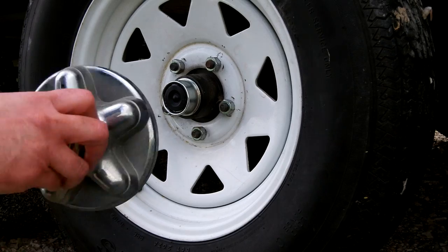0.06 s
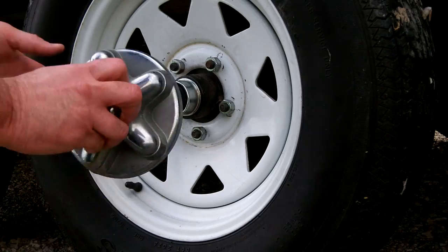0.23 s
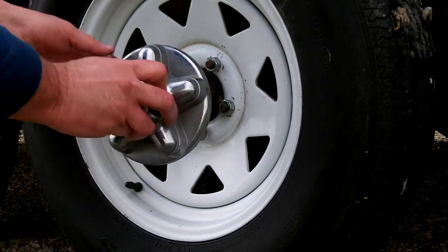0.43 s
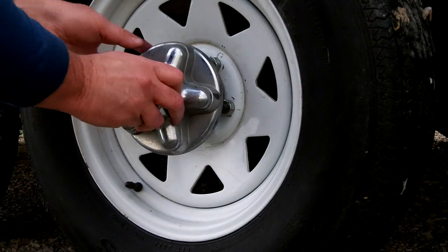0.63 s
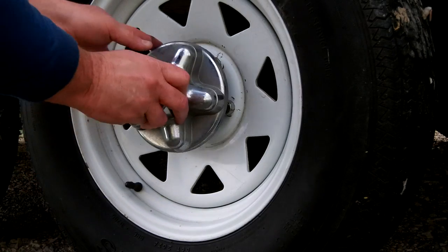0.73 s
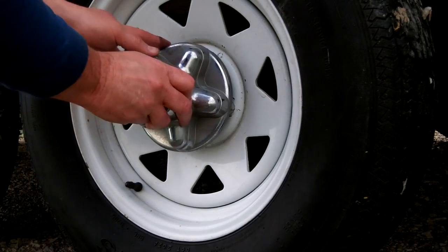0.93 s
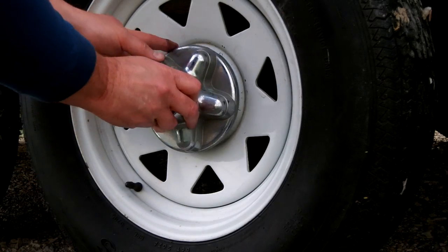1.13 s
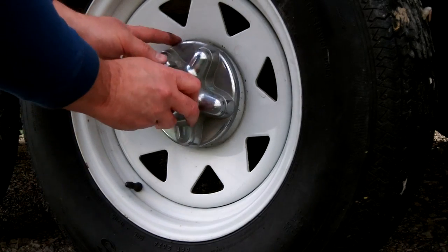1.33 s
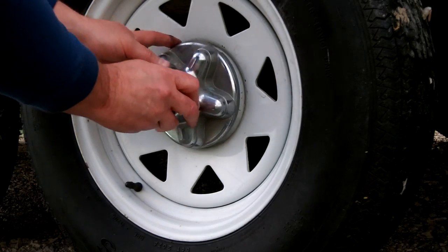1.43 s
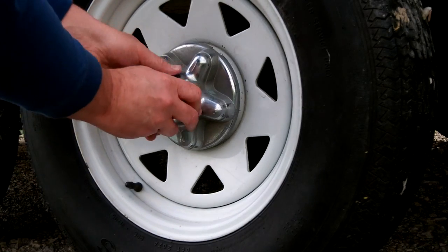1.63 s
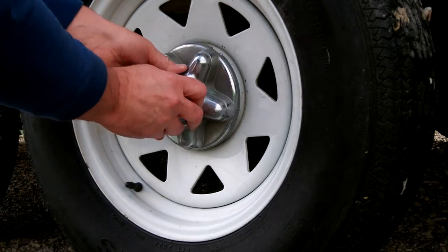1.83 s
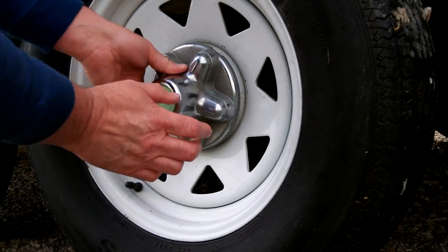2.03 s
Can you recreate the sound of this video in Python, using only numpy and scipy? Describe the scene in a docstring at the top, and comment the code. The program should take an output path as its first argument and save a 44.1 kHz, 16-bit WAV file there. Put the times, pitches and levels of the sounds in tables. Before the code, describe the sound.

A metal hubcap scrapes and taps against a wheel hub, then snaps into place.

```python
"""Low handling rumble, rustling sleeves and a faint hiss of open air, on one microphone close to a trailer
wheel outdoors. A steel hubcap is pushed on: its rim scrapes and taps the hub, then snaps home at 1.7 s,
and a faint bright hiss follows. Each strike, and each stick-slip click of a scrape, rings the cap's modes
and a brief clatter of cap and wheel. The hands damp the ring."""
import sys
import numpy as np
from scipy import signal
from scipy.fft import rfft, irfft, next_fast_len
from scipy.io import wavfile
from scipy.ndimage import uniform_filter1d

SR = 44100
rng = np.random.default_rng(int(sys.argv[2]) if len(sys.argv) > 2 else 0)


def master_out(mix):
    """Clip the mix to full scale and print it as 16-bit PCM to the path in sys.argv[1]."""
    frames = np.transpose(np.atleast_2d(mix))
    ceiling = np.clip(frames, -1, 1)
    pcm = np.round(ceiling * 32767).astype(np.int16)
    wavfile.write(sys.argv[1], SR, pcm)


N = 91728


def undb(db):
    """Decibels to gain."""
    return 10 ** (np.asarray(db) / 20)


def unit(x):
    """Scale to rms 1."""
    return x / np.sqrt(np.mean(x ** 2) + 1e-20)


def add(out, start_s, x):
    """Mix a sound in at a time."""
    i = int(start_s * SR)
    out[i:i + len(x)] += x[:len(out) - i]


def curve(rows):
    """Gain over time from (t/s, level/dB) points."""
    return undb(np.interp(np.arange(N) / SR, *np.array(rows).T))


def flutter(rate_hz, spread_db):
    """Gain that wanders smoothly at random around 0 dB."""
    hold = int(SR / rate_hz)
    steps = np.repeat(rng.standard_normal(N // hold + 1), hold)
    return undb(spread_db * unit(uniform_filter1d(steps, hold)[:N]))


def fade(t, t60):
    """Exponential decay, 60 dB down after t60 seconds."""
    return np.exp(-np.log(1000) * t / t60)


def colour(x, points, hump=None):
    """Causal filter through (f/Hz, level/dB) points, with an optional narrow (f/Hz, boost/dB) hump."""
    n = 2 * next_fast_len(len(x))
    octave = np.log2(np.maximum(np.arange(n // 2 + 1) * SR / n, 1))
    hz, db = np.array(points, float).T
    shape_db = np.interp(octave, np.log2(hz), db)
    if hump:
        hump_hz, boost_db = hump
        width_octaves = 0.13
        shape_db += boost_db * np.exp(-.5 * ((octave - np.log2(hump_hz)) / width_octaves) ** 2)
    # minimum phase: nothing sounds ahead of a strike
    cepstrum = irfft(np.log(undb(shape_db)))
    cepstrum[1:n // 2] *= 2
    cepstrum[n // 2 + 1:] = 0
    return irfft(rfft(x, n) * np.exp(rfft(cepstrum)))[:len(x)]


def noise(spectrum):
    """Scene-long noise of rms 1, shaped by (f/Hz, level/dB) points."""
    return unit(colour(rng.standard_normal(N), spectrum))


def outdoor_air():
    """The open air around the trailer: a faint, dull hiss."""
    # spectrum of the hiss: f/Hz, relative level/dB
    spectrum = [(150, -16), (250, -3.5), (450, -4.5), (1100, -12.5), (1650, -15.5), (2500, -21),
                (3150, -19.5), (4400, -28.5), (5600, -43), (6900, -58), (7400, -65), (11000, -58.5),
                (15000, -74.5)]
    # its course: t/s, level/dB
    levels = [(0, -64), (.55, -64.5), (.85, -64), (1.15, -64), (1.8, -61.5), (1.95, -66.5), (2.08, -62.5)]
    return noise(spectrum) * curve(levels) * flutter(rate_hz=18, spread_db=0.86)


def handling():
    """Handling makes a wavering low rumble and a few soft one-cycle bumps."""
    # spectrum of the rumble: f/Hz, relative level/dB
    spectrum = [(12, 2.5), (30, 5), (60, -7), (110, -10.5), (200, -16.5), (320, -26.5), (700, -67)]
    # its course: t/s, level/dB
    levels = [(0, -48.5), (.17, -45.5), (.42, -51), (.68, -50.5), (.8, -50), (1.15, -50.5), (1.35, -55),
              (1.55, -55), (1.85, -48.5), (2.08, -52.5)]
    # soft bumps: t/s, level/dB, f/Hz
    bumps = [(.037, -38, 80), (.118, -49, 56), (0.152, -35.5, 73), (0.259, -37.5, 44.7),
             (0.303, -41.5, 92.6), (0.657, -42, 54.4), (0.713, -42, 43.4), (.719, -47.5, 150),
             (0.823, -43.5, 79), (.984, -44.5, 118), (2.027, -41.5, 65.6)]
    t = np.arange(N) / SR
    out = noise(spectrum) * curve(levels) * flutter(rate_hz=14, spread_db=2)
    for at, db, hz in bumps:
        phase_squared = (np.pi * hz * (t - at)) ** 2
        out += undb(db) * (1 - 2 * phase_squared) * np.exp(-phase_squared)
    return out


def sleeves():
    """Cloth rustles unevenly near the microphone as the arms carry the cap to the wheel."""
    # spectrum of the cloth: f/Hz, relative level/dB
    spectrum = [(800, -24.5), (2000, -5.5), (3200, 0.5), (4500, -7.5), (6800, -26.5), (7600, -45)]
    # its course: t/s, level/dB
    levels = [(0, -81), (.05, -64.5), (.13, -77), (.3, -71.5), (.68, -79), (.85, -78), (1.15, -71),
              (1.8, -83.5), (1.95, -86.5)]
    return noise(spectrum) * curve(levels) * flutter(rate_hz=30, spread_db=5)


def cap_ring(contact_db, bass_db, treble_db, hump, modes_db=0):
    """The hand-damped cap answers one contact: modes and clatter, coloured by its force and position."""
    # modes of the steel cap: f/Hz, relative level/dB, t60/s
    modes = [(183.4, -19.5, 0.11), (402, -11.5, .04), (567, -13, .07), (803, -3, 0.046), (954, -4, 0.03),
             (1325, -16, 0.075), (1465, -5.5, .05), (1643, -13, 0.09), (1756, -2.5, 0.026),
             (2039, -0.5, 0.039), (2390, -1.5, 0.057), (2754, 1, 0.036), (2919, 2, 0.032),
             (3660, -10.5, .045), (4170, 2, 0.029), (4620, -6, .045), (5010, 3, 0.024), (5550, -8, .04)]
    # spectrum of the crowd of short-lived resonances of cap and wheel: f/Hz, relative level/dB
    clatter_spectrum = [(120, -19.5), (400, -11.5), (600, -6), (800, 3), (1050, -5), (1200, -9.5),
                        (2700, -1.5), (3400, -4.5), (5200, -5.5), (6000, -16.5), (6600, -14.5), (7400, -22),
                        (8250, -44), (9000, -20), (11500, -48), (15000, -64.5)]
    t = np.arange(16384) / SR
    ring = sum((-1) ** k * undb(db) * fade(t, t60) * np.sin(2 * np.pi * hz * t)
               for k, (hz, db, t60) in enumerate(modes))
    steel = signal.sosfilt(signal.butter(4, 6500, fs=SR, output="sos"), ring)
    rise = 1 - np.exp(-t / 0.00017)
    decay = fade(t, t60=0.026) + undb(-37.5) * fade(t, t60=0.18)  # brief burst, faint tail
    clatter = colour(rng.standard_normal(len(t)) * rise * decay, clatter_spectrum)
    sizzle_db = 2.5 + 1.6 * (contact_db + 21)  # only hard contacts reach the top octave
    tone = [(854, bass_db), (2300, 0), (5030, treble_db), (6970, treble_db),
            (8500, treble_db + sizzle_db)]
    return colour(undb(modes_db) * unit(steel) + undb(-2) * unit(clatter), tone, hump)


def rim_scrapes():
    """The rim slides on the hub: uneven stick-slip clicks ring the cap."""
    # slides, the longest being the steady rub under the push:
    # t/s, length/s, level/dB, bass/dB, treble/dB, hump f/Hz, boost/dB
    slides = [(0.423, 0.233, -74.5, 0, -6, 3130, 15), (0.531, 0.026, -66, 0, -2, 3070, 5.5),
              (1.176, 0.69, -62, 1, 1.5, 3140, 3.5), (1.209, 0.022, -60.5, -15, -14, 4100, 20),
              (1.328, 0.014, -56.5, 2, 2, 5300, -6), (1.374, 0.054, -56, -7.5, 2, 2830, 4),
              (1.419, .028, -46.5, -1, -5.5, 2850, 8), (1.445, .066, -55.5, -8.5, -8.5, 1830, 7),
              (1.46, .026, -45.5, -5.5, -7.5, 2350, 2), (1.566, 0.058, -52.5, -4.5, -14.5, 2100, 8),
              (1.689, 0.021, -37.5, 0, -7, 5300, 10.5), (1.755, 0.016, -48.5, 5.5, -6, 2600, 13)]
    slips_per_s, slip_spread_db, edge_s = 1800, 2, 0.006
    out = np.zeros(N)
    for start, length, db, bass, treble, hz, boost in slides:
        n = int(length * SR)
        slips = rng.random(n) < slips_per_s / SR
        strengths = undb(slip_spread_db * rng.standard_normal(n)) * rng.choice([-1, 1], n)
        force = slips * strengths * signal.windows.tukey(n, min(2 * edge_s / length, 1))
        ring = cap_ring(db, bass, treble, (hz, boost), modes_db=-4.5)  # lasting contact mutes the modes
        scrape = signal.fftconvolve(force, ring)
        rms = np.sqrt(np.sum(scrape ** 2) / n + 1e-20)
        add(out, start, undb(db) * scrape / rms)
    return out


def rim_taps():
    """The rim strikes the hub; the tight, loud run at 1.7 s is the cap snapping home."""
    # strikes: t/s, level/dB, bass/dB, treble/dB, hump f/Hz, boost/dB
    strikes = [(1.1872, -44.5, 6.5, -3.5, 2800, 9), (1.1935, -60, -7, 1, 2500, -3),
               (1.2505, -50, 3, -15, 4200, 22), (1.2936, -32.5, 5.5, -7, 1200, 14),
               (1.2990, -41, 3.5, -13, 2300, 4), (1.3415, -33, -4, 7.5, 4600, 6),
               (1.4262, -43, -5.5, 2.5, 4100, 8.5), (1.4340, -48, 15, -9, 2800, -1),
               (1.4420, -48.5, -1.5, -8, 2850, 15), (1.5868, -35.5, -8, -17, 1900, 6.5),
               (1.5912, -40.5, 0, -33.5, 1650, 27.5), (1.598, -36, 1.5, 7, 730, 8),
               (1.6003, -29, -0.5, -6, 2830, 14.5), (1.6048, -38.5, -4, -9, 2850, 11.5),
               (1.6970, -42, 2.5, -18, 1600, 8.5), (1.7039, -30, 1.5, -3, 900, 7),
               (1.7075, -23, -2.5, -6.5, 2900, -1.5), (1.7107, -17.5, 0, 4.5, 5000, 8),
               (1.7135, -27, -6, 2, 2250, 11), (1.7770, -30, -2.5, -3.5, 4000, 4.5),
               (1.7797, -47, -15, 17, 2400, 9)]
    out = np.zeros(N)
    for start, db, bass, treble, hz, boost in strikes:
        ring = cap_ring(db, bass, treble, (hz, boost))
        peak_rms = np.sqrt(uniform_filter1d(ring ** 2, size=128).max())  # loudest 3 ms
        add(out, start, undb(db) * ring / peak_rms)
    return out


def bright_puff():
    """A faint, bright hiss flares and fades once the cap is seated."""
    # spectrum of the puff: f/Hz, relative level/dB
    spectrum = [(1000, -7.5), (4000, -5.5), (8000, -7), (12000, -12), (15500, -16)]
    hiss = undb(-61.5) * noise(spectrum) * fade(np.arange(N) / SR, t60=0.2)
    out = np.zeros(N)
    add(out, start_s=1.8125, x=hiss)
    return out


def scene():
    """Air, hands and cap at one microphone close to the wheel."""
    return (outdoor_air() + handling() + sleeves() + rim_scrapes() + rim_taps() + bright_puff())[None]


def record(dry):
    """The recorder cuts the top steeply above 15.7 kHz."""
    return signal.sosfilt(signal.ellip(8, .2, 70, 15700, fs=SR, output="sos"), dry)


dry = scene()
out = record(dry)
master_out(out)
```